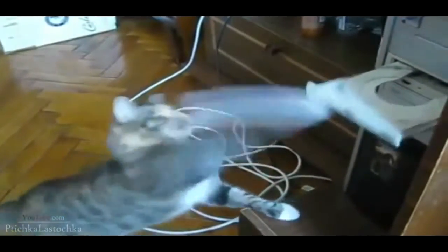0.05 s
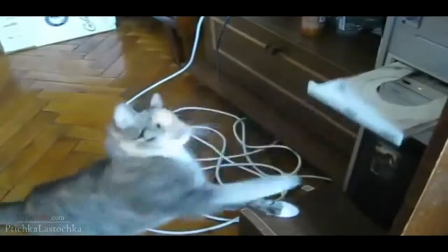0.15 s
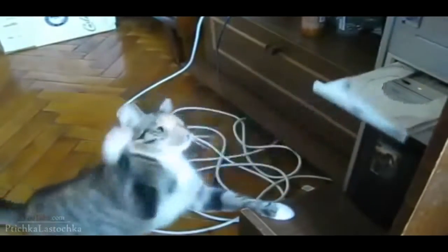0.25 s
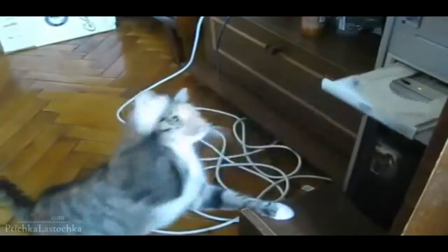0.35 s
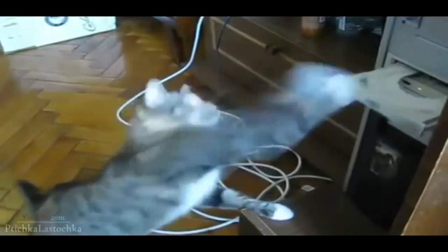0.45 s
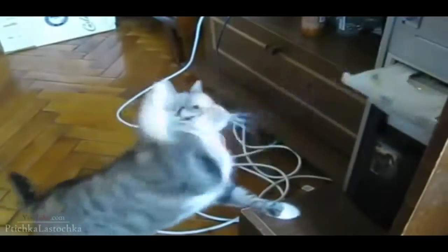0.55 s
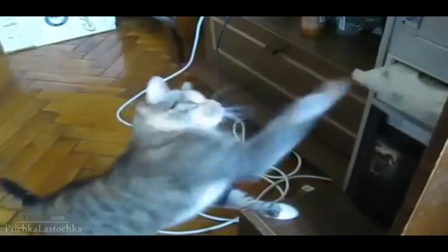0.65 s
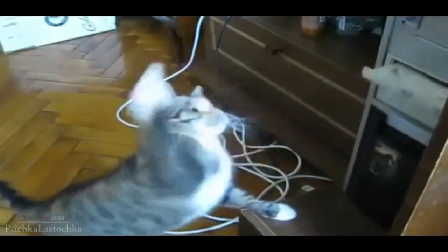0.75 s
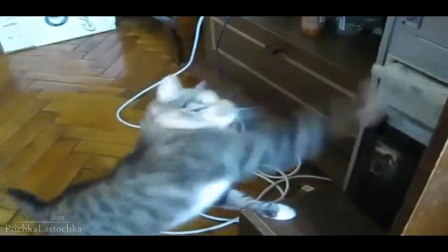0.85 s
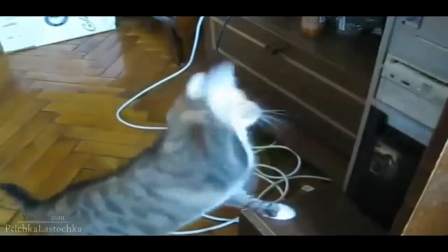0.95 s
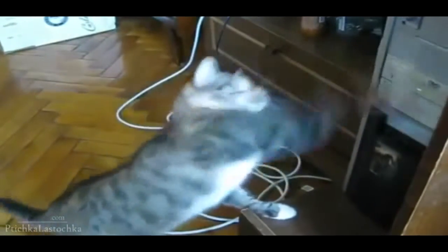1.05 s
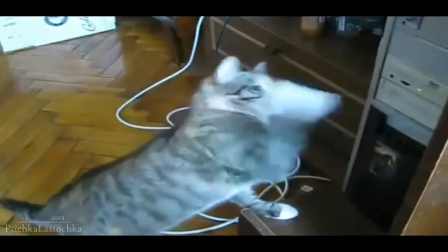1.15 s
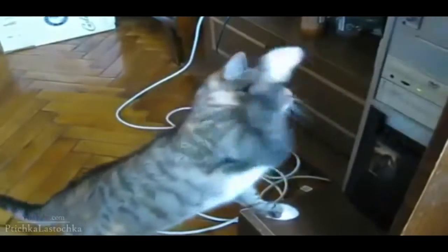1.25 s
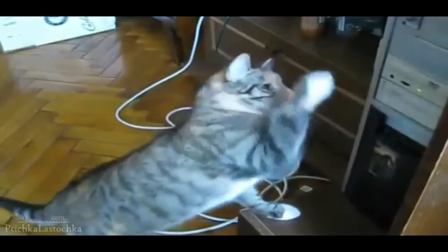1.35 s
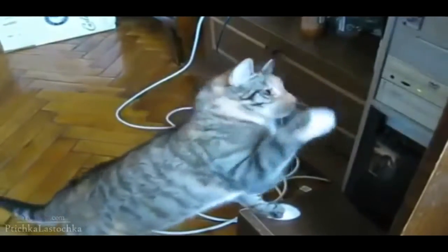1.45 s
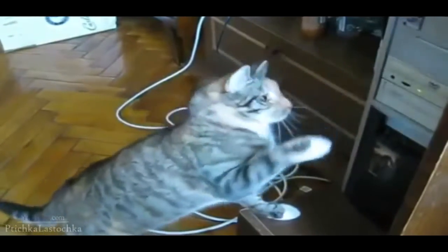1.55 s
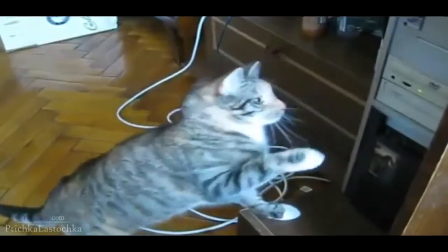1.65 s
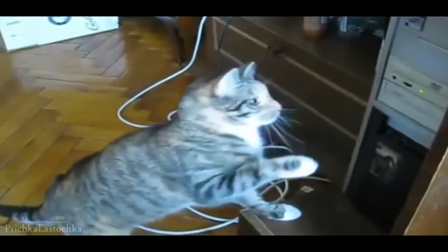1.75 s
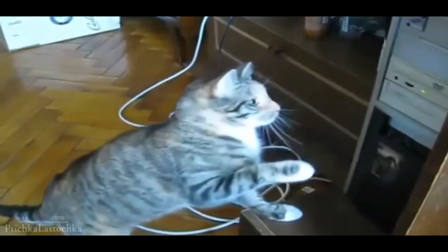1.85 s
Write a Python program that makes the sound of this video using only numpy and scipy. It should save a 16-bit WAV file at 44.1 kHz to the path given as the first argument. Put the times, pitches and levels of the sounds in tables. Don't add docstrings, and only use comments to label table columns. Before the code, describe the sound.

A plastic disc tray, quiet over computer fans until 0.2 s, clacks sharply at 0.21 and 0.34 with dense rattling to about 0.55, then faint chatter and gear whir. Hard clacks follow at 0.73, 0.89 and 1.11, with scraping ticks. Dull knocks at 1.29 lead to the faceplate slam at 1.32 and a bright tick. Close, heavily limited microphone; room echo swells between blows, then fades into fan noise.

```python
import sys
import numpy as np
from scipy import signal
from scipy.fft import rfft, irfft
from scipy.io import wavfile

SR = 44100
rng = np.random.default_rng(int(sys.argv[2]) if len(sys.argv) > 2 else 0)


def bounce(signal):
    frames = np.transpose(np.atleast_2d(signal))
    limited = np.clip(frames, -1, 1)
    pcm = np.round(limited * 32767).astype(np.int16)
    wavfile.write(sys.argv[1], SR, pcm)


def ratio(d):
    e = np.asarray(d, float) / 20
    return 10 ** e


N = 85995
BLOW_N = 2600


def evened(x):
    return x / np.sqrt(np.mean(x ** 2) + 1e-20)


def read(points, hz):
    f, value = np.transpose(points)
    return np.interp(np.log(hz + 1), np.log(f + 1), value)


def add(mix, start_s, sound):
    part = mix[round(start_s * SR):][:len(sound)]
    part += sound[:len(part)]


def coloured(x, points):
    hz = abs(np.fft.fftfreq(4096, 1 / SR))
    log_gain = np.log(ratio(read(points, hz)))
    taps = np.fft.ifft(np.exp(np.conj(signal.hilbert(log_gain)))).real[:2048]
    return signal.oaconvolve(x, taps)[:len(x)]


def band(x, lo_hz, hi_hz):
    return signal.sosfilt(signal.butter(2, [lo_hz, hi_hz], "bandpass", fs=SR, output="sos"), x)


def smoothed(x, ms):
    r = np.exp(-1000 / (ms * SR))
    return signal.lfilter([1 - r], [1, -r], x)


def rung(drive, modes, pitch):
    t = np.arange(len(drive)) / SR
    ring = np.zeros(len(drive))
    for hz, db, t60 in modes:
        decay_s = np.clip(t60 * pitch ** 0.5, 0.005, 0.026)
        ring += ratio(db - 60 * t / decay_s) * np.sin(2 * np.pi * hz * pitch * t)
    return signal.fftconvolve(drive, ring)[:len(drive)]


# (frequency [Hz], level [dB], t60 [s])
TRAY_MODES = [(1637, 4, 0.035), (2630, -1, 0.037), (3327, 3.5, 0.029), (3440, -22, 0.083),
              (3840, -25, 0.046), (4496, -23, 0.066), (5400, -28, 0.043), (6330, -36, 0.041),
              (6400, -18, 0.046), (7300, -32, 0.083), (8240, -11, 0.033), (10500, -22, 0.057)]
RATTLE_SPREAD_HZ = 2830


def clack(db, hz, contact_ms, spread_hz, dull_db, noise):
    t = np.arange(len(noise)) / SR
    u = t * 1000 / contact_ms
    attack = np.minimum(u / 0.215, 1)
    scrape = np.exp(-np.minimum(u, 6) ** 1.87)
    shiver = ratio(-10) * np.exp(-t * 1000 / 11.8)
    burst = noise * attack * (scrape + shiver)

    boom_db = -16.5 + 30 * np.log10(spread_hz / RATTLE_SPREAD_HZ)
    layers = [
        (0, band(burst, max(hz - spread_hz / 2, 600), hz + spread_hz / 2)),
        (-8.5, band(burst, 2350, 8100)),
        (-15.5, rung(burst, TRAY_MODES, 1)),
        (-20 + dull_db, band(burst, 10400, 15000)),
        (-21.5 + dull_db, band(burst, 8600, 10000)),
        (boom_db, band(burst, 390, 1290)),
    ]
    return ratio(db) * sum(ratio(layer_db) * x / abs(x).max() for layer_db, x in layers)


# (time [s], strength [dB], brightest [Hz], contact [ms], spread [Hz])
CLACKS = [
    (0.207, 1, 4140, 3.02, 1700),
    (.3414, 3, 3800, 3.8, 1280),
    (0.729, 2, 4280, 2.4, 3600),
    (0.8941, 0, 3680, 2.9, 2000),
    (1.1097, 2.5, 3600, 4, 2920),
]
# (time [s],
# strength [dB], brightest [Hz], contact [ms])
RATTLES = [(.2316, -1, 4260, 4.9), (.245, -8.5, 3350, 3.8), (.2585, -5, 3840, 2.1), (.277, -19, 3960, 7.4),
           (.287, -13.5, 3820, 2.3), (0.3257, -9, 4000, 9.2), (0.4357, -11.5, 3400, 11),
           (.4797, -6, 4540, 3.5), (.513, -22, 3400, 4.5), (.5248, -11, 3900, 7.1), (.565, -39, 3000, 3),
           (.585, -24.5, 4370, 1.9), (.6075, -19.5, 3270, 9.2), (.63, -23, 3500, 8.8),
           (.6505, -25, 2520, 3), (.667, -22, 3340, 4), (.678, -21, 3400, 5.5), (.6855, -17.5, 3420, 2.9),
           (.9085, -15, 3500, 4), (.913, -3.5, 4300, 10), (1.015, -18.5, 2900, 4.9),
           (1.203, -17, 3030, 6.9),
           (0.295, -21, 4000, 1.9),
    (0.47, -18, 3550, 5.5),
    (0.538, -24.5, 3000, 3),
    (.718, -35, 3000, 2.2),
    (1.119, -3, 3530, 4.7),
    (1.124, -6, 2760, 9.9),
    (1.136, -12, 4300, 4.3),
    (1.338, -6.5, 3360, 2.2),
    (1.345, -15, 4400, 7),
]
# (frequency [Hz], level [dB])
TRAY_SPREAD = [(60, -33), (250, -7), (800, -6), (2000, 1), (3500, -1), (6500, -5.5), (9000, -10),
               (15000, -21.5)]
CLACK_DB, RATTLE_DB, RATTLE_DULL_DB = 5, 0.5, -4


def tray():
    out, snaps = np.zeros(N), np.zeros(N)
    blows = [(CLACK_DB, 0, row) for row in CLACKS]
    blows += [(RATTLE_DB, RATTLE_DULL_DB, (*row, RATTLE_SPREAD_HZ)) for row in RATTLES]
    for lift_db, dull_db, (start_s, db, hz, contact_ms, spread_hz) in blows:
        noise = rng.standard_normal(BLOW_N)
        add(out, start_s, clack(db + lift_db, hz, contact_ms, spread_hz, dull_db, noise))
        add(snaps, start_s, ratio([db + lift_db]))
    return out, coloured(snaps, TRAY_SPREAD)


# (time [s], strength [dB], share of pitch [ratio])
LATCH = [
    (1.292, -13.5, .38),
    (1.3003, -20, 0.39),
    (1.316, 6.5, 1.001),
]
# (frequency [Hz], level [dB], t60 [s])
LATCH_MODES = [(760, -20.5, 0.032), (1160, -1.5, 0.028), (1500, -10, 0.017), (1890, 3, 0.031),
               (2187, 1, 0.04), (2900, 3.5, 0.019), (3600, -16, 0.018), (4500, -17, 0.012),
               (6350, -25, .012)]
# (frequency [Hz], level [dB])
LATCH_SPREAD = [(60, -43), (250, -3.5), (800, 2.5), (2000, 4.5), (3500, -1), (6500, -9), (9000, -15),
                (15000, -15)]
LOW_CUT_HZ, LATCH_CRACK_DB = 225, -11


def latch():
    out, snaps = np.zeros(N), np.zeros(N)
    t = np.arange(BLOW_N) / SR
    for start_s, db, pitch in LATCH:
        blow = np.exp(-((t - 0.0002) * pitch / 0.00006) ** 2)
        ring = band(rung(blow, LATCH_MODES, pitch), LOW_CUT_HZ, 12000)
        burst = rng.standard_normal(BLOW_N) * np.exp(-t / 0.012)
        crack = band(band(burst, 600, 500 + 6000 * pitch ** 3), 430, 7200)
        sound = ring / abs(ring).max() + ratio(LATCH_CRACK_DB) * crack / abs(crack).max()
        add(out, start_s, ratio(db) * sound)
        add(snaps, start_s, ratio([db]))
    return out, coloured(snaps, LATCH_SPREAD)


# (time [s], level [dB])
GEARS = [(0.199, -90), (0.218, -20), (.32, -33), (.4, -27), (.5, -31), (.56, -38), (0.698, -34),
         (0.801, -21), (0.949, -39), (1.019, -24), (1.09, -34), (1.17, -28), (1.22, -36.5), (1.292, -29.5),
         (1.33, -91)]
# (frequency [Hz], level [dB per Hz])
GEAR_COLOUR = [(59, -50), (100, -10.5), (153, 1), (370, -5), (564, 5), (879, 1.5), (3540, 2.5), (9340, -17),
               (15500, -35)]
TEETH_PER_S, TOOTH_SPREAD_DB = 4000, 2.2


def gears():
    size = ratio(TOOTH_SPREAD_DB * np.minimum(rng.exponential(1, N), 4)) * rng.standard_normal(N)
    teeth = size * (rng.random(N) < TEETH_PER_S / SR)
    friction = 0.17 * rng.standard_normal(N)
    whir = evened(coloured(teeth + friction, GEAR_COLOUR))
    effort_db = np.interp(np.arange(N) / SR, *np.transpose(GEARS))
    return whir * ratio(effort_db)


# (frequency [Hz], t60 [s])
ROOM = [(150, 0.71), (500, 0.58), (1500, 0.53), (3500, 0.49), (7000, .4), (13000, 0.21)]


def room(x):
    taps = rng.standard_normal(SR) * (rng.random(SR) < 0.25)
    hz, t, z = signal.stft(taps, SR, nperseg=256)
    decay = ratio(-60 * t / read(ROOM, hz)[:, None])
    tail = signal.istft(z * decay, SR, nperseg=256)[1][:SR]
    tail = tail * np.clip((np.arange(SR) / SR - 0.003) / 0.002, 0, 1)
    return signal.fftconvolve(x, tail / np.linalg.norm(tail))[:N]


# (frequency [Hz], level [dB per Hz])
HUM = [(20, -8.5), (60, -1.5), (160, -3.5), (450, -5), (1200, -1), (2500, -7), (6000, -16), (15500, -29)]
# (frequency [Hz], width [Hz], level [dB])
FAN_BANDS = [(156, 30, -19), (900, 280, -16.5), (1195, 73, -9), (1700, 69, -7.5), (2260, 68, -11)]
HUM_DB = -45.5


def hum():
    settle = 2048
    air = evened(coloured(rng.standard_normal(N + settle), HUM))
    for hz, width_hz, db in FAN_BANDS:
        noise = rng.standard_normal(N + settle)
        air = air + ratio(db) * evened(band(noise, hz - width_hz / 2, hz + width_hz / 2))
    return ratio(HUM_DB) * evened(air[settle:])


ROOM_DB, LATCH_ROOM_DB, GEAR_ROOM_DB, DIRECT_ROOM_DB = 14, 13.5, -7, -12


def scene():
    clacks, snaps = tray()
    slam, slam_snaps = latch()
    whir = gears()
    sent = ratio(ROOM_DB) * snaps + ratio(LATCH_ROOM_DB) * slam_snaps
    sent = sent + ratio(GEAR_ROOM_DB) * whir + ratio(DIRECT_ROOM_DB) * (clacks + slam)
    return (clacks + slam + whir + room(sent) + hum())[None]


def roll_off(x):
    return signal.sosfilt(signal.butter(12, 16460, fs=SR, output="sos"), x)


LIMIT_DB, DUCK_SHARE, SENSE_MS, GRAB_MS, RECOVER_DB_PER_S = -12, 0.92, 1.18, 5.3, 136.5
CEILING = 0.75
NOTCH_HZ, NOTCH_WIDTH_HZ, NOTCH_DB, EDGE_HZ = 7900, 215, -29, 14700


def record(dry):
    sound = dry[0]
    power_db = 10 * np.log10(smoothed(sound ** 2, SENSE_MS) + 1e-12)
    fall = np.arange(N) * RECOVER_DB_PER_S / SR
    held_db = np.maximum.accumulate(power_db + fall) - fall
    over_db = np.maximum(held_db - LIMIT_DB, 0)
    ducked = sound / ratio(DUCK_SHARE * smoothed(over_db, GRAB_MS))

    bent = CEILING * np.tanh(ducked / CEILING) - ducked
    clipped = ducked + bent - smoothed(bent, 0.68)

    hz = np.fft.rfftfreq(N, 1 / SR)
    dip = ratio(NOTCH_DB / (1 + ((hz - NOTCH_HZ) / NOTCH_WIDTH_HZ) ** 2))
    band_limit = 1 / (1 + (hz / EDGE_HZ) ** 40)
    mix = irfft(rfft(clipped) * dip * band_limit, N)[None]
    return roll_off(mix)


dry = scene()
out = record(dry)
bounce(out)
```